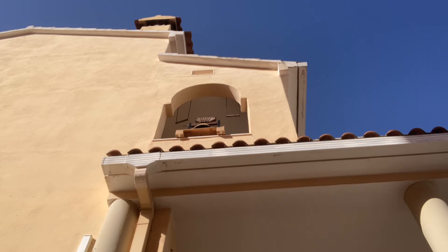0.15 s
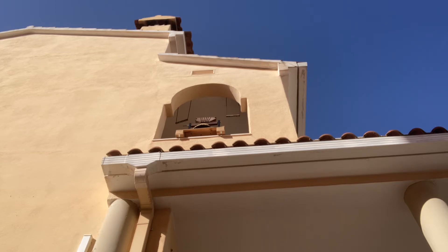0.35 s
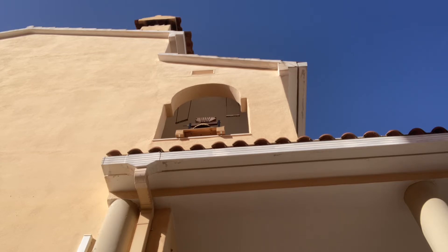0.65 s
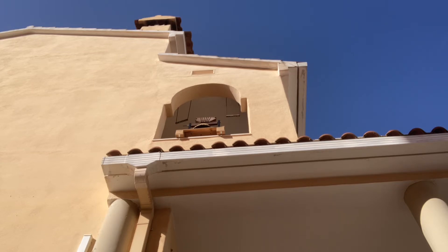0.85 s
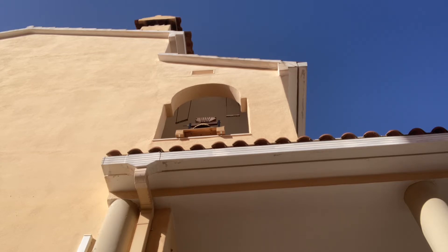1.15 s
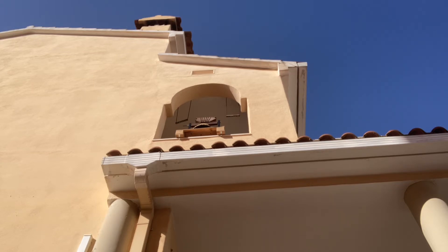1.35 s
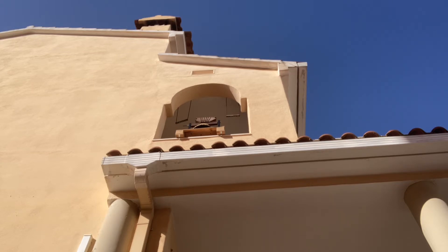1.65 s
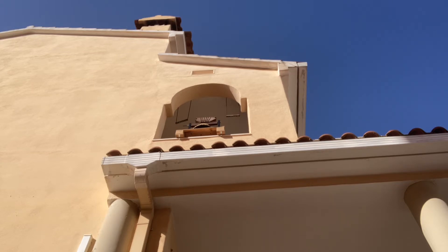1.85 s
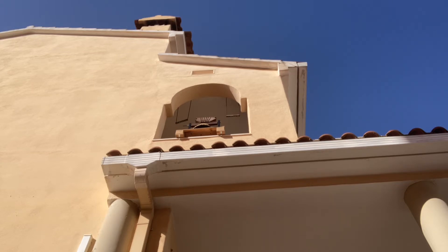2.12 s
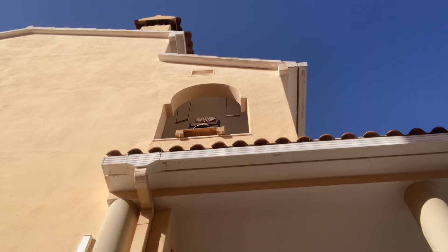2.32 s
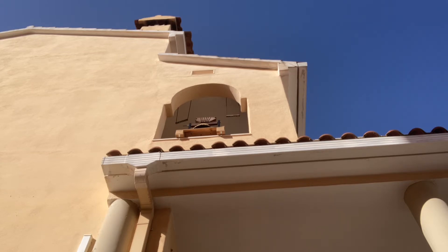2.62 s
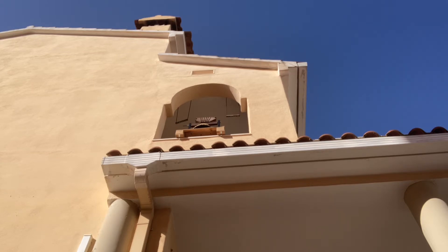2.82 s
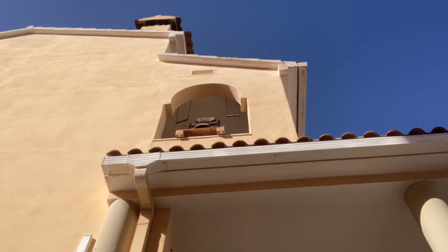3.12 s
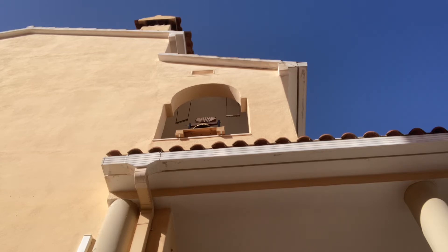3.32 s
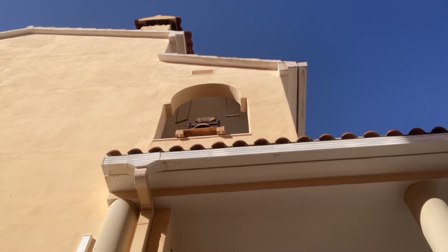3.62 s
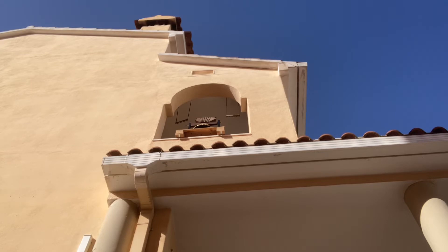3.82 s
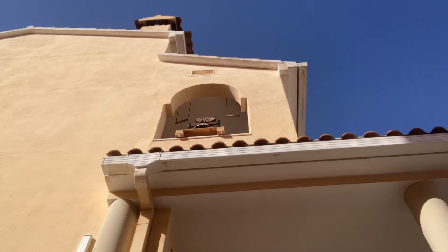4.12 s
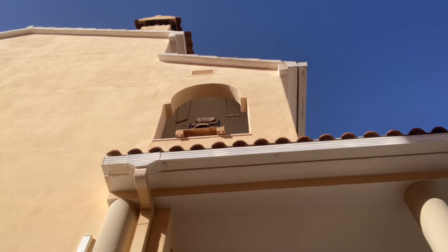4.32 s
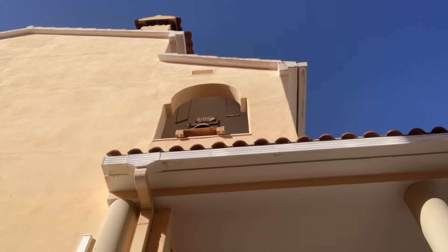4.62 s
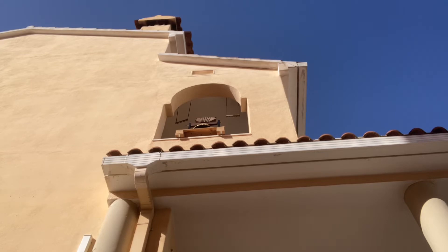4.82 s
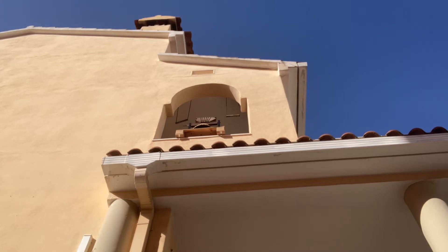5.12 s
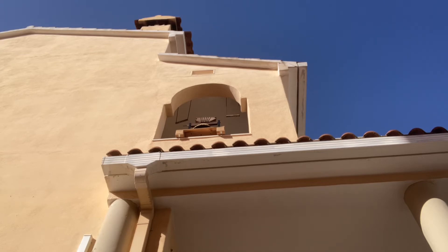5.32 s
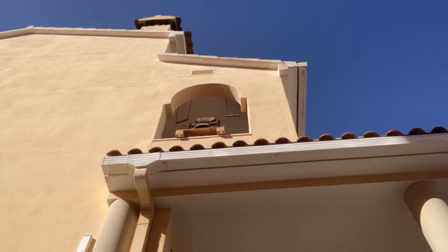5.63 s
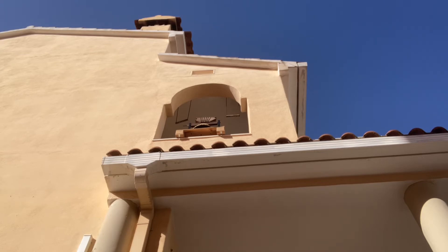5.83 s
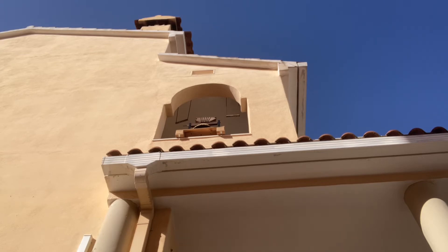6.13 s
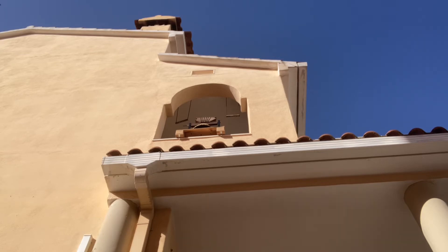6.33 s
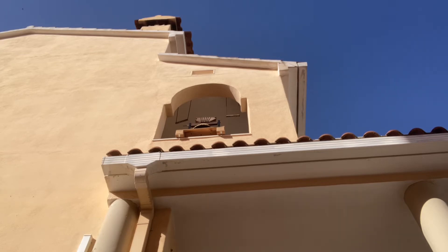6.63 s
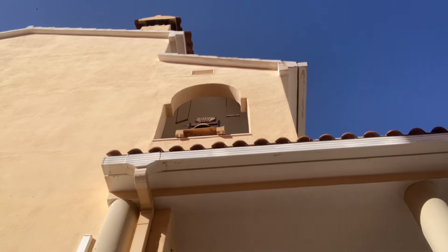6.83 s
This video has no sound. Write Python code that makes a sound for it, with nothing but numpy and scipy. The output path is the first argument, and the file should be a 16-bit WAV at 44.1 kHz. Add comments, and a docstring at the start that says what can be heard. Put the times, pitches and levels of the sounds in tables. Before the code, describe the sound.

The last stroke of a small bell is dying away in a niche in a house wall. Its hammer rattles briefly and strikes once, a bright clang with lower tones ringing on. Sparrows then chirp more loudly, their calls echoing between the walls. Soft gusts murmur under the eaves, leaves rustle faintly and distant traffic swells. The bell is fairly close to the microphone, in a quiet outdoor yard.

```python
"""A small bell's last stroke is dying away; then its hammer rattles and strikes once: a bright clang,
after which a few low tones ring on in the bell's niche in a house wall. Sparrows whistle chirps and
chirrups that echo between the walls. Gusts murmur under the eaves, leaves rustle,
and far-off traffic swells, with an engine's drone and faint squeals."""
import sys
import numpy as np
from scipy import signal
from scipy.io import wavfile
from scipy.ndimage import uniform_filter1d

SR = 44100
rng = np.random.default_rng(int(sys.argv[2]) if len(sys.argv) > 2 else 0)


def bounce(signal):
    """Save signal as a 16-bit WAV file at the path given by the first command-line argument."""
    frames = np.transpose(np.atleast_2d(signal))
    limited = np.clip(frames, -1, 1)
    pcm = np.round(limited * 32767).astype(np.int16)
    wavfile.write(sys.argv[1], SR, pcm)


N = 306936
TIME = np.arange(N) / SR
CUTOFF_HZ = 15750

# the bell's clang, countless close overtones; t60 is the time it takes to fade by 60 dB:
# (frequency [Hz], level [dB], t60 [s])
CLANG = [(180, -79.5, .4), (340, -64, 0.84), (610.6, -48.5, 0.27), (860, -75, 1), (1610, -55, 0.34),
         (2100, -60.5, 0.49), (2800, -56, 0.5), (4470, -56.5, 0.41), (6400, -54, 0.32), (7170, -68.5, 0.48),
         (9930, -51, 0.22), (11580, -68, 0.33), (15500, -70, 0.23)]
# the syllables of a sparrow's chirp, each an arch in pitch: (time after the main top [s], rise [s],
# fall [s], top [share of call's pitch], rise [octaves], fall [octaves], roundness, level [dB],
# overtone [dB])
CHIRP_SHAPE = [(0, .02, .03, 0.99, .28, .53, 1.05, 0, -38),
               (.061, 0.026, .024, .905, .37, .66, .75, -1.5, -44)]


def bell(direct=0.56, build_s=0.012, waver_db=-0.56, twin_db=-25, twin_life=1.78):
    """A hard hammer sets the bell ringing; echoes in the niche build up its tones and smear the clang."""
    # hammer blows, the first just before the start: (time [s], strength [dB])
    strokes = [(-0.47, -10.5), (1.297, -1.5)]
    # the bell's separate tones: (frequency [Hz], level [dB], t60 [s])
    partials = [(420.5, -41.5, 1.65), (489.3, -41, 2.5), (603, -39, .38), (636, -42, .55),
                (848, -33.5, .88), (923, -31.5, 1.16), (926, -60, 3.6), (986, -32.5, 1.03),
                (1008.5, -37.4, 1.0), (1141, -47, 1.15), (1229.6, -29, .73), (1260, -35, .73),
                (1318, -29, .7), (1475, -44, .6), (1561, -41, .9), (1604, -49, 1.05), (1789, -34.5, .45),
                (1844, -47, .85), (1878, -32.5, .76), (1927, -27.5, .8), (1966.5, -35, .8), (2003, -42, .7),
                (2158, -35.5, .57), (2236, -37, .6), (2729, -44, .65), (2859, -35, .43), (3117, -30, .36),
                (3185, -31, .36), (3262, -33, .36), (3301, -32, .38), (3775, -32, .42), (3850, -30, .34),
                (4008, -30, .3), (4479, -28, .31), (4560, -31, .33)]
    t = TIME[:3 * SR]
    ring = np.zeros(len(t))
    for hz, level_db, t60 in partials:
        # each tone has a faint twin that the mounting damps less
        fade = from_db(-60 * t / t60) + from_db(twin_db - 60 * t / (twin_life * t60))
        gain = from_db(level_db + waver_db * drift(6.2)[:len(t)])
        ring += fade * gain * np.sin(2 * np.pi * (hz * t + rng.random()))
    ring *= 1 - (1 - direct) * np.exp(-t / build_s)
    ring += from_db(-10) * overtones(t, spread_db=19.5)
    for hz, band in noise_bands(len(t)):  # the smeared clang is a wash of fading noise
        level_db, t60 = at_hz(CLANG, hz)
        ring += band * from_db(level_db - 1.5 - 60 * t / t60)
    out = np.zeros(N)
    for s, strength_db in strokes:
        add(out, s, from_db(strength_db) * ring)
    return out


def overtones(t, spread_db, count=600, low_hz=2300):
    """The bronze's crowded high tones, uneven in strength, follow the colour and fade of the clang."""
    offsets, phases = rng.random((count, 2)).T
    spacing_hz = (CUTOFF_HZ - low_hz) / count
    frequencies = low_hz + spacing_hz * (np.arange(count) + offsets)
    level_db, t60s = at_hz(CLANG, frequencies)
    uneven = rms_one(from_db(spread_db * np.clip(rng.standard_normal(count), -2, 2)))
    gains = uneven * from_db(level_db) * np.sqrt(2 * spacing_hz)
    out = np.zeros(len(t))
    for hz, gain, t60, phase in zip(frequencies, gains, t60s, phases):
        age = t[:round(t60 * SR)]
        add(out, 0, gain * from_db(-60 * age / t60) * np.sin(2 * np.pi * (hz * age + phase)))
    return out


def linkage():
    """Iron rubs on iron as the hammer is pulled."""
    # the rattle just before the blow: (time [s], level [dB])
    rattle = [(1.225, -100), (1.236, -54.5), (1.26, -59.5), (1.295, -50), (1.32, -100)]
    # where the iron rings: (frequency [Hz], width [Hz], level [dB])
    resonances = [(1210, 200, 9), (4400, 130, 13.5), (5640, 120, 7.5), (9450, 2500, 1.5)]
    rub = rng.standard_normal(N)
    iron = sum(from_db(db) * resonate(rub, hz, width) for hz, width, db in resonances)
    return from_db(in_time(rattle)[0]) * rms_one(iron)


def sparrows(wall_echo_s=0.078):
    """Birds in the open are heard directly, hidden ones by their echoes; a wall returns each chirrup."""
    # two-syllable chirps: (time [s], pitch [Hz], level [dB], direct share [0-1])
    chirps = [(.005, 4940, -59.5, 0.34), (0.646, 4690, -55, 0.73), (1.005, 4920, -67.5, 0.9),
              (2.079, 4905, -50.5, 1), (2.843, 4750, -49.5, .9), (3.178, 5060, -58.5, 0.46),
              (3.754, 4770, -63, 0.8), (4.488, 4570, -54.5, 0.2), (4.728, 5030, -59, 0.6),
              (5.7, 4960, -58, 0.43), (6.301, 4906, -49, 0.3), (6.36, 4690, -57, 0.03),
              (6.57, 5010, -58.5, 0.48), (6.7, 5050, -61, .1)]
    # three-syllable chirrups of a bird facing a wall: (same four columns, wall echo [dB])
    chirrups = [(2.713, 4796, -42.5, 0.41, -18), (4.021, 4477, -42, 0.23, -8.5),
                (5.076, 4678, -41.5, 0.43, -12), (6.051, 4615, -42, 0.44, -18)]
    # thin, high contact notes: columns as in chirps
    tsips = [(.755, 6600, -71, 1), (0.87, 6160, -66, 1), (0.931, 6030, -59.5, 0.32),
             (2.235, 6900, -67.5, 0.7), (3.62, 6740, -64.5, 0.4), (4.428, 5890, -55, 0.25),
             (4.46, 5000, -44.5, 0.35), (4.509, 4990, -62, .15)]
    # the syllables of a chirrup and of a contact note: columns as in CHIRP_SHAPE
    chirrup_shape = [(-.08, .024, 0.051, 0.94, 0.199, 0.61, 1.7, -7, -25.5),
                     (0, .022, .027, 1, 0.38, .55, 1.9, 0.5, -24.5),
                     (.049, .022, .034, .89, .55, .68, .8, 0, -30)]
    tsip_shape = [(0, 0.0093, .018, 0.96, 0.2, 0.49, 2.5, 0, -30.5)]
    direct, sung = np.zeros(N), np.zeros(N)
    for shape, calls in (CHIRP_SHAPE, chirps), (chirrup_shape, chirrups), (tsip_shape, tsips):
        for s, pitch_hz, level_db, share, *wall_echo in calls:
            for start, note in call(shape, s, pitch_hz):
                add(sung, start, from_db(level_db) * note)
                add(direct, start, share * from_db(level_db) * note)
                for echo_db in wall_echo:
                    add(direct, start + wall_echo_s, from_db(level_db + echo_db) * note)
    return direct + yard(sung)


def call(shape, s, pitch_hz):
    """A sparrow's call is a run of syllables: yields (start [s], samples)."""
    for delay, rise, fall, top, rise_octaves, fall_octaves, roundness, level_db, overtone_db in shape:
        note = syllable(rise, fall, top * pitch_hz, rise_octaves, fall_octaves, roundness, overtone_db)
        yield s + delay - rise, from_db(level_db) * note


def syllable(rise, fall, top_hz, rise_octaves, fall_octaves, roundness, overtone_db,
             jitter=0.021, fade_db_per_octave=11, edge_db_per_octave=22):
    """A whistle sweeps up, then down; its low ends are weaker, but richer in the octave overtone."""
    t = np.arange(-rise, fall, 1 / SR)
    from_top = np.abs(np.where(t < 0, t / rise, t / fall)) ** roundness
    octaves_down = np.where(t < 0, rise_octaves, fall_octaves) * from_top
    wobble = rms_one(uniform_filter1d(rng.standard_normal(SR // 10), size=60))[:len(t)]
    hz = top_hz * 2 ** -octaves_down * (1 + jitter * wobble)
    phase = 2 * np.pi * np.cumsum(hz) / SR
    whistle = from_db(-fade_db_per_octave * octaves_down) * np.sin(phase)
    edge = from_db(overtone_db + edge_db_per_octave * octaves_down) * np.sin(2 * phase)
    return (whistle + edge) * signal.windows.tukey(len(t), alpha=0.36)


def breeze(porch_db=-4, murmur_db=-10):
    """Moving air murmurs in the hollow porch under the eaves and swells in gusts."""
    # the steady wind: (time [s], level [dB])
    steady = [(0, -54.5), (2.4, -48.5), (3.1, -55.5), (4.3, -54), (5.0, -52), (6.3, -48), (6.96, -53)]
    # gusts on top of it: (peak time [s], length [s], level [dB])
    gusts = [(.29, 0.55, -46.5), (.73, 0.24, -48), (1.08, 0.18, -45), (5.04, 0.17, -40.5),
             (5.67, 0.11, -43.5), (6.41, 0.17, -45.5)]
    # where the porch hums: (frequency [Hz], width [Hz], level [dB])
    resonances = [(180.6, 34, -1), (227.1, 36.6, 1.5), (260.3, 29, 1.5), (412.3, 72, -7), (497, 19, -16.5)]
    # the murmur's colour: (frequency [Hz], level [dB])
    colour = [(40, -50.5), (60, -25.5), (100, 6), (135, -14.5), (180, -1), (250, 6.5), (320, -3.5),
              (460, -21.5), (600, -25), (1200, -43.5)]
    porch = sum(from_db(db) * narrow_noise(hz, width) for hz, width, db in resonances)
    air = from_db(porch_db) * rms_one(porch) + from_db(murmur_db) * coloured(colour, flutter_db=2)
    return swells(gusts, in_time(steady)[0]) * air


def traffic():
    """Tyres rush on a far road, with one engine's low note and thin squeals."""
    # the road's swell: (time [s], level [dB])
    road = [(0, -64.5), (1.1, -68), (2.2, -63.5), (2.8, -60), (3.5, -55), (4.3, -54), (4.8, -53.5),
            (5.2, -56), (6.2, -57), (6.96, -60)]
    # the tyres' colour: (frequency [Hz], level [dB])
    colour = [(45, -43), (70, 10.5), (150, 10.5), (400, 10), (600, 1), (900, 0), (1400, -3), (2000, -14),
              (3500, -20.5), (7000, -25.5)]
    # the engine's note: (time [s], pitch [Hz], level [dB])
    drone = [(0, 71.7, -81), (2.8, 68.7, -75), (3.3, 69.2, -68.5), (3.7, 71.9, -70.5), (3.95, 68.2, -52.5),
             (4.3, 65.8, -65), (4.7, 65, -82.5), (6.96, 68, -72)]
    # far squeals: (start [s], end [s], pitch [Hz], width [Hz], level [dB])
    squeals = [(2.214, 2.808, 1810, 262, -71.5), (2.68, 3.15, 2443, 223, -66),
               (2.79, 3.504, 2188, 129, -67.5), (3.294, 3.848, 2960, 348, -67),
               (3.434, 4.403, 2370, 70.4, -64.5)]
    out = from_db(in_time(road)[0] - 1) * coloured(colour, flutter_db=1)
    engine_hz, engine_db = in_time(drone)
    engine_gain = from_db(engine_db + 1.5 * drift(5.6)) * np.sqrt(2)
    wavering_hz = engine_hz * (1 + 0.0094 * drift(24))
    out += engine_gain * np.sin(2 * np.pi * np.cumsum(wavering_hz) / SR)
    for start, end, pitch_hz, width_hz, level_db in squeals:
        swell = np.sin(np.pi * np.clip((TIME - start) / (end - start), 0, 1))
        squeal = narrow_noise(pitch_hz, width_hz)
        out += from_db(level_db - 1.5 * drift(18)) * swell * squeal
    return out


def flock(count=90, low_hz=4400, spread_hz=550):
    """Far sparrows chirp at random and are heard only by their echoes."""
    # the flock's loudness: (time [s], level [dB])
    levels = [(0, -100), (1.1, -93), (2.4, -86.5), (3.3, -101.5), (4.0, -64), (4.8, -73), (5.6, -74.5),
              (6.96, -81)]
    sung = np.zeros(N)
    for k, (offset, pitch) in enumerate(rng.random((count, 2))):
        s = (k + offset) / count * N / SR
        for start, note in call(CHIRP_SHAPE, s, low_hz + spread_hz * pitch):
            add(sung, start, note)
    return from_db(in_time(levels)[0]) * rms_one(yard(sung))


def leaves(gain_db=2):
    """Leaves stirred by the air rustle in short flurries."""
    # flurries: (peak time [s], length [s], level [dB])
    rustles = [(4.07, 0.069, -76), (4.28, 0.07, -70), (4.77, 0.096, -72.5), (4.96, 0.21, -67.5),
               (5.38, 0.036, -69.5), (5.68, 0.21, -80.5), (6.1, 0.11, -78), (6.71, .2, -79)]
    # the rustle's colour: (frequency [Hz], level [dB])
    colour = [(3000, -28.5), (6500, -7), (8500, -2.5), (11500, 7.5), (13000, -2.5), (15500, -31)]
    return from_db(gain_db) * swells(rustles, steady_db=-83) * coloured(colour, flutter_db=-2)


def hiss(level_db=-76.5):
    """A faint, even hiss lies under everything."""
    # its colour: (frequency [Hz], level [dB])
    colour = [(1000, -5.5), (4000, 13), (7000, 7), (12000, 6), (14000, -5.5), (15500, -13)]
    return from_db(level_db) * coloured(colour, flutter_db=0)


def yard(x, near_db=-4.5, near_t60=0.64, far_db=-11, far_t60=0.98, build_s=0.006, dull_hz=7000):
    """Dulled echoes alone: scattered ones from the nearest walls, a long tail from the houses around."""
    t = TIME[:SR]
    near = rng.standard_normal(SR) * (rng.random(SR) < .02) * from_db(-60 * t / near_t60)
    far = rng.standard_normal(SR) * from_db(-60 * t / far_t60)
    arrived = 1 - np.exp(-t / build_s)
    echoes = from_db(near_db) * rms_one(arrived * near) + from_db(far_db) * rms_one(arrived * far)
    echoes = signal.sosfilt(signal.butter(4, dull_hz, fs=SR, output="sos"), echoes / np.sqrt(SR))
    return signal.fftconvolve(x, echoes)[:N]


def from_db(db):
    """Turn decibels into a gain."""
    return 10 ** (np.asarray(db) / 20)


def rms_one(x):
    """Scale to an average strength (rms) of 1."""
    return x / np.sqrt(np.mean(x ** 2) + 1e-20)


def in_time(rows):
    """Read each column of a time table at every sample."""
    s, *columns = np.transpose(rows)
    return [np.interp(TIME, s, column) for column in columns]


def at_hz(rows, hz):
    """Read each column of a frequency table at hz."""
    frequencies, *columns = np.transpose(rows)
    return [np.interp(np.log(hz), np.log(frequencies), column) for column in columns]


def add(out, s, sound):
    """Mix a sound in, starting at time s."""
    i = round(s * SR)
    sound, i = sound[max(-i, 0):], max(i, 0)
    out[i:i + len(sound)] += sound[:max(N - i, 0)]


def swells(rows, steady_db):
    """Gain of a steady level with smooth humps on top; their powers add."""
    power = from_db(steady_db) ** 2
    for s, length, level_db in rows:
        power = power + from_db(level_db) ** 2 * np.exp(-(2 * (TIME - s) / length) ** 2)
    return np.sqrt(power)


def drift(rate_hz, step=40):
    """A slow random wander with a spread of 1."""
    r = np.exp(-2 * np.pi * rate_hz * step / SR)
    slow = signal.lfilter([1], [1, -2 * r, r * r], rng.standard_normal(N // step + 2002))[2000:]
    return np.interp(np.arange(N) / step, np.arange(len(slow)), rms_one(slow))


def resonate(x, hz, width_hz):
    """Pass a sound through one resonance with a gain of 1 at its peak."""
    r = np.exp(-np.pi * width_hz / SR)
    feedback = [1, -2 * r * np.cos(2 * np.pi * hz / SR), r * r]
    return signal.lfilter(np.array([1, 0, -1]) * (1 - r * r) / 2, feedback, x)


def narrow_noise(hz, width_hz):
    """Noise sent twice through a resonance, so it has a pitch; rms 1."""
    return rms_one(resonate(resonate(rng.standard_normal(N), hz, width_hz), hz, width_hz))


def noise_bands(size):
    """Noise in bands a third of an octave wide, at 0 dB per Hz: yields (centre [Hz], samples)."""
    edges = np.geomspace(40, 16500, 27)
    white = rng.standard_normal((2, size + SR // 4)) * np.sqrt(SR / 2)
    for k, (low, high) in enumerate(zip(edges, edges[1:])):
        band = signal.sosfilt(signal.butter(2, [low, high], "band", fs=SR, output="sos"), white[k % 2])
        yield np.sqrt(low * high), band[-size:]


def coloured(colour, flutter_db):
    """Noise with a given balance of low and high, whose bands each flutter on their own; rms 1."""
    return rms_one(sum(band * from_db(at_hz(colour, hz)[0] + flutter_db * drift(12))
                       for hz, band in noise_bands(N)))


def scene(tail_low_hz=2200):
    """All sources in one channel; the bell is near, so the houses return only a faint, high tail."""
    stroke = bell() + linkage()
    tail = yard(stroke, near_db=-29.5, near_t60=.4, far_db=-18.5, far_t60=1.0, dull_hz=4600)
    tail = signal.sosfilt(signal.butter(2, tail_low_hz, "high", fs=SR, output="sos"), tail)
    return (stroke + tail + sparrows() + flock() + traffic() + breeze() + leaves() + hiss())[None]


def record(dry, low_cut_hz=55):
    """The microphone drops the deep bass; the highest treble is cut."""
    thin = signal.sosfilt(signal.butter(6, low_cut_hz, "high", fs=SR, output="sos"), dry)
    return signal.sosfilt(signal.ellip(12, .1, 80, CUTOFF_HZ, fs=SR, output="sos"), thin)


dry = scene()
out = record(dry)
bounce(out)
```